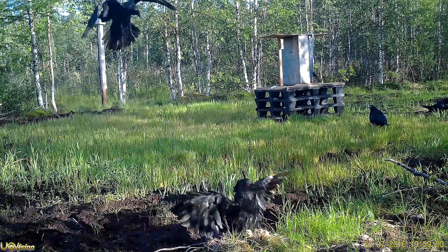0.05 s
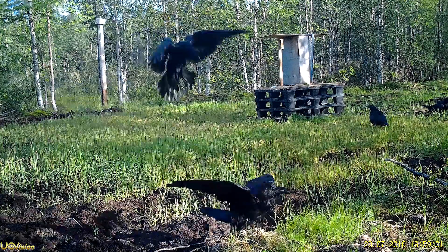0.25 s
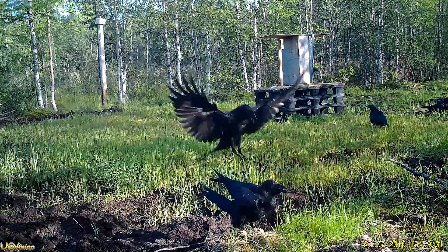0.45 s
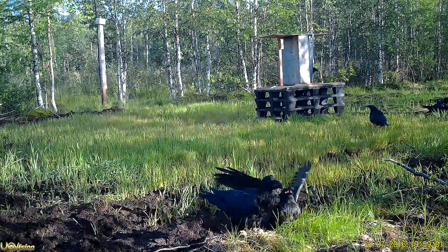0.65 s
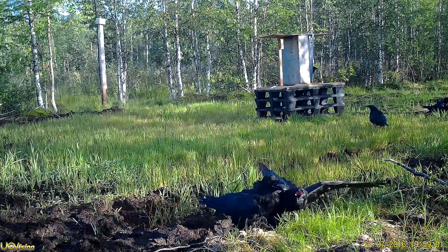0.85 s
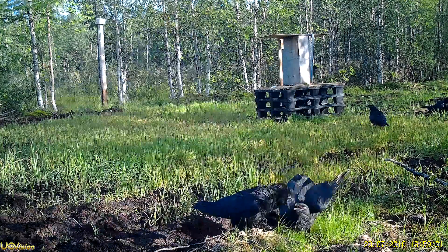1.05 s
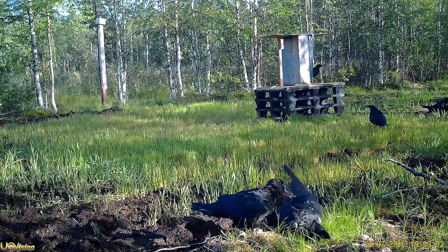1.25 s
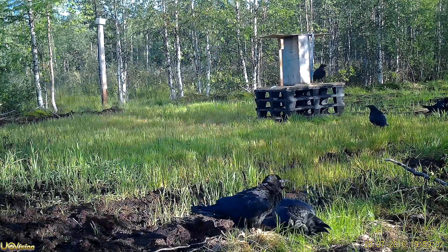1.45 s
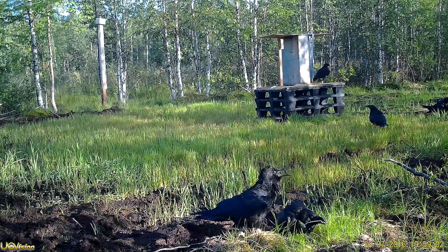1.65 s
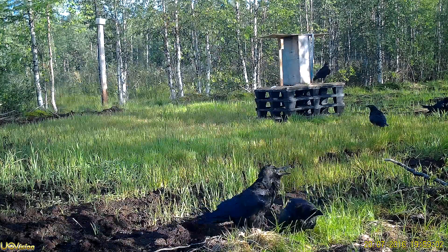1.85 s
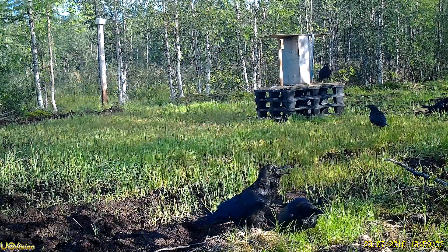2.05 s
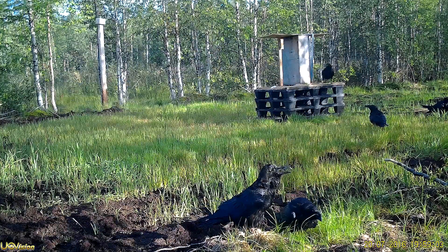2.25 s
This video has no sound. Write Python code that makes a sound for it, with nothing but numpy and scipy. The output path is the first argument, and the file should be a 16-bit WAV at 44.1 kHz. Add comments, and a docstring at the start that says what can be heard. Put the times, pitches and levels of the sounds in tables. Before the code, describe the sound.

Two hoarse raven caws outdoors, the second breaking into a rasping scream.

```python
"""Two ravens squabbling in a forest clearing.

Two harsh, arching caws from vibrating throat membranes, each shaken by a fast flutter. In the second,
a lower voice beats against the note, which breaks into a turbulent scream. The throat pops as it opens
and shuts; wings swish and low grunts sound. Ground and trees return a faint echo over quiet air."""
import sys
import numpy as np
from scipy import signal
from scipy.fft import rfft, irfft
from scipy.io import wavfile
from scipy.ndimage import uniform_filter1d

SR = 44100
rng = np.random.default_rng(int(sys.argv[2]) if len(sys.argv) > 2 else 0)


def log_audio(samples):
    """Write samples as a 16-bit WAV file to the path given in sys.argv[1]."""
    # one column per channel
    frames = np.atleast_2d(samples).T
    # limit to full scale, then quantise
    limited = np.clip(frames, -1, 1)
    pcm = np.round(limited * 32767).astype(np.int16)
    wavfile.write(sys.argv[1], SR, pcm)


N = 101429


def undb(db):
    """Decibels to gain."""
    return 10 ** (np.asarray(db) / 20)


def unit(x):
    """Scale to rms 1."""
    return x / np.sqrt(np.mean(x ** 2))


def gain_at(hz, spectrum):
    """Gain of an (f/Hz, level/dB) curve, interpolated over log frequency."""
    f, db = np.array(spectrum, float).T
    return undb(np.interp(np.log(np.maximum(hz, 1)), np.log(f), db))


def coloured(x, spectrum):
    """Filter by an (f/Hz, level/dB) curve; rms 1."""
    f = np.arange(N // 2 + 1) * SR / N
    return unit(irfft(rfft(x) * gain_at(f, spectrum), N))


def noise(spectrum):
    """Coloured noise, rms 1."""
    return coloured(rng.standard_normal(N), spectrum)


def wander(rate_hz):
    """Smooth random drift up to about rate_hz, rms 1."""
    f = np.arange(N // 2 + 1) * SR / N
    return unit(irfft(rfft(rng.standard_normal(N)) * np.exp(-(f / rate_hz) ** 2), N))


def swell(t, centre, length):
    """Gaussian rise and fall."""
    return np.exp(-8 * ((t - centre) / length) ** 2)


def ramp(t, start, length):
    """Linear rise from 0 to 1."""
    return np.clip((t - start) / length, 0, 1)


# Air and rumble spectra: f/Hz, relative level/dB
AIR_SPECTRUM = [(15, -34), (25, -4), (113, 0), (209, -5), (400, -9), (1620, -19), (15500, -23.5)]
RUMBLE_SPECTRUM = [(20, -6), (60, -6), (150, -6), (300, -11.5), (700, -22), (2000, -34)]
# Rumble envelope: t/s, level/dB
RUMBLE_ENVELOPE = [(0, -67), (.4, -60), (1.2, -60.5), (1.45, -69.5), (2.3, -72.5)]


def air(t, steady_db=-71):
    """Steady outdoor air, and a rumble of stirred air that dies down as the birds settle."""
    rumble_db = np.interp(t, *np.array(RUMBLE_ENVELOPE).T)
    rumble = noise(RUMBLE_SPECTRUM) * undb(rumble_db + 1.5 * wander(19))
    return undb(steady_db) * noise(AIR_SPECTRUM) + rumble


# Echo spectra: f/Hz, relative level/dB
GROUND_SPECTRUM = [(300, -6), (1400, -4.5), (4000, -1), (15000, -3)]
FOREST_SPECTRUM = [(300, -1), (1600, -0.5), (4500, -2.5), (15000, -9.5)]


def clearing(t, x):
    """Add quick, bright scatter from the grass and a faint echo from trees that absorb treble."""
    def tail(spectrum, db, t60_s, rise_s):
        envelope = undb(-60 * t / t60_s) * (1 - np.exp(-t / rise_s))
        return undb(db) * unit(noise(spectrum) * envelope) / np.sqrt(N)
    ground = tail(GROUND_SPECTRUM, db=-19, t60_s=.19, rise_s=.0028)
    forest = tail(FOREST_SPECTRUM, db=-47, t60_s=1.0, rise_s=.047)
    return x + signal.fftconvolve(x, ground + forest)[:N]


# Wing strokes: centre t/s, length/s, level/dB
WING_STROKES = [(0.045, 0.18, -64.5), (0.264, 0.084, -68), (0.646, 0.091, -63)]
# Feather noise: f/Hz, relative level/dB
FEATHER_SPECTRUM = [(200, 1), (2000, 3), (6000, -1), (13000, -8.5), (16000, -23)]


def wings(t):
    """Feathers swish with a grainy flicker."""
    envelope = sum(undb(db) * swell(t, at, length) for at, length, db in WING_STROKES)
    return noise(FEATHER_SPECTRUM) * undb(2.9 * wander(200)) * envelope


# Grunts ending the second caw: centre t/s, length/s, f/Hz, level/dB
GRUNTS = [(1.079, .016, 338.5, -42), (1.099, 0.014, 322, -39.5), (1.122, 0.011, 438, -32.5),
          (1.132, 0.017, 362, -35.5)]


def grunts(t):
    """Short low tones from the scuffle."""
    return sum(undb(db) * swell(t, at, length) * np.sin(2 * np.pi * hz * (t - at))
               for at, length, hz, db in GRUNTS)


# Throat pops: t/s, ring level/dB, crack level/dB
POPS = [(.185, -42, -43), (.194, -34, -44.5), (0.204, -40.5, -36.5), (0.554, -51, -35.5),
        (0.591, -38, -60.5), (.643, -31, -57), (.762, -28, -50), (.769, -25, -37), (.781, -29.5, -24.5),
        (1.116, -10.5, -38), (1.128, -6, -30.5)]
# Throat modes: f/Hz, relative level/dB, T60/s
THROAT_MODES = [(1180, -0.5, 0.012), (1430, -1, .015), (1736, -9, 0.025), (2550, -19, .014)]
# Crack noise: f/Hz, relative level/dB
CRACK_SPECTRUM = [(300, -23.5), (800, -6.5), (1400, 4.5), (4500, -6), (8000, -20), (15000, -46.5)]


def pops(t, ring_rise_s=.00069, crack_rise_s=.0003, crack_decay_s=.0025):
    """The throat opens and shuts: each pulse rings its modes, with a short crack."""
    rings, cracks = 0, 0
    for start, ring_db, crack_db in POPS:
        age = np.maximum(t - start, 0)
        ring = sum(undb(db - 60 * age / t60) * np.sin(2 * np.pi * hz * age)
                   for hz, db, t60 in THROAT_MODES)
        rings += undb(ring_db) * ring * (1 - np.exp(-age / ring_rise_s)) ** 2
        cracks += undb(crack_db) * np.exp(-age / crack_decay_s) * (1 - np.exp(-age / crack_rise_s))
    return rings + cracks * noise(CRACK_SPECTRUM)


# Scream envelope: t/s, level/dB
SCREAM_ENVELOPE = [(.939, -50), (.956, -32.5), (.98, -24), (1.005, -28.5), (1.035, -41), (1.07, -46.5),
                   (1.09, -65)]
# Throat turbulence (shared with second_caw) and snap noise: f/Hz, relative level/dB
HARSH_RASP = [(300, -46), (550, -32.5), (800, -7.5), (1050, -12), (1450, 1.5), (1750, 7.5), (2000, -5.5),
              (2600, -12.5), (4500, -2.5), (6200, -6), (7700, -13.5), (8600, -24.5), (9500, -13.5),
              (12000, -27), (15000, -48.5)]
SNAP_SPECTRUM = [(400, -51), (2700, -12.5), (4200, 3), (7600, -4), (8600, -21.5), (9500, -11), (12000, -19),
                 (15000, -43.5)]


def scream(t, burst_hz=108, throb_db=4.5, snap_decay_s=.0032):
    """The second caw breaks into uneven bursts of turbulence, each opening with a bright snap."""
    started = t > SCREAM_ENVELOPE[0][0]
    cycles = np.cumsum(burst_hz * (1 + .097 * wander(80)) * started) / SR
    envelope = undb(np.interp(t, *np.array(SCREAM_ENVELOPE).T, left=-np.inf, right=-np.inf))
    roar = undb(throb_db * (np.cos(2 * np.pi * cycles) - 2)) * noise(HARSH_RASP)
    burst_age = (cycles % 1) / burst_hz
    snaps = undb(1 + 2 * wander(100)) * np.exp(-burst_age / snap_decay_s) * noise(SNAP_SPECTRUM)
    return envelope * (roar + snaps)


def flutter(t, start, rate_hz=86.4, slowing_hz_per_s=50):
    """Phase and depth of a fast tremble that slows through a caw, then calms."""
    age = t - start
    hz = (rate_hz - slowing_hz_per_s * np.clip(age, 0, .5)) * (1 + .035 * wander(40))
    phase = 2 * np.pi * np.cumsum(hz * (age > 0)) / SR
    depth = 1 - .75 * ramp(age, start=.3, length=.063)
    return phase, depth


def creak(age, flutter_phase, depth_db=22, fade_s=.03, lag_cycles=.38):
    """Onset gain: each flutter cycle snaps open and sags, less and less."""
    sag = (flutter_phase / (2 * np.pi) - lag_cycles) % 1 - .3
    return uniform_filter1d(undb(-depth_db * np.exp(-age / fade_s) * sag), size=24)


def beak_notch(age, hz, start_hz=8550, climb_hz_per_s=10000, width_hz=740, gain_db=-14.5):
    """Gain of a treble dip that climbs as the beak opens."""
    offset_hz = hz - start_hz - climb_hz_per_s * age
    return undb(gain_db * np.exp(-(offset_hz / width_hz) ** 2))


EDGE_S = .012
HOARSE_DB, HOARSE_FADE_S = 7.5, .07
RESONANCE_HZ, RESONANCE_FLANK_HZ = 1430, 260


def voice(t, contour, throat, turbulence, tremble, *, swing, jitter, shimmer_db, rasp_db,
          h1_throb_db, h2_throb_db, treble_throb_db):
    """One membrane: flutter swings pitch and level; each cycle jitters and lets out a puff of noise."""
    times, *columns = np.array(contour, float).T
    pitch, h1_db, h2_db, treble_db = (np.interp(t, times, c) for c in columns)
    flutter_phase, depth = tremble
    age = np.maximum(t - times[0], 0)
    gate = ramp(t, times[0] - EDGE_S, EDGE_S) * (1 - ramp(t, times[-1], EDGE_S))
    shake = depth * (np.cos(flutter_phase) + .25 * np.cos(2 * flutter_phase)) * (1 + .3 * wander(60))
    hoarse = undb(HOARSE_DB * np.exp(-age / HOARSE_FADE_S))
    hz = pitch * (1 + swing * shake + jitter * hoarse * depth * wander(700))
    phase = 2 * np.pi * np.cumsum(hz) / SR

    h1 = undb(h1_db + h1_throb_db * shake) * np.sin(phase)
    # Above the main throat resonance, each upswing of pitch weakens harmonic 2.
    flank = ramp(2 * pitch, RESONANCE_HZ, RESONANCE_FLANK_HZ)
    h2 = undb(h2_db - h2_throb_db * flank * shake) * np.sin(2 * phase)

    overtones, power = 0, 0
    for k in range(3, 24):
        gain = throat(t, k * hz) * beak_notch(age, k * hz) * (k * hz < SR / 2)
        throb_db = treble_throb_db * np.cos(flutter_phase + .5 * (k - 3)) + shimmer_db * wander(220)
        overtones += gain * undb(depth * throb_db) * np.sin(k * phase + rng.uniform(0, 2 * np.pi))
        power += gain ** 2

    puffs = coloured(rng.standard_normal(N) * (1 + np.cos(phase)), turbulence)
    rasp = hoarse * undb(rasp_db + 4 * depth * np.cos(flutter_phase)) * np.sqrt(depth) * puffs
    treble = undb(treble_db) * (overtones / np.sqrt(power) + rasp)
    return np.sqrt(2) * gate * creak(age, flutter_phase) * (h1 + h2 + treble)


RESHAPE_S = .06
# Open throat response, then its change: f/Hz, relative level/dB
FIRST_THROAT = [(1500, 0.5), (1900, 3), (2250, 3.5), (2600, -0.5), (3000, 4.5), (3400, -7.5), (4150, -13),
                (4700, -9.5), (5200, -16), (5750, -12), (6800, -21), (8300, -27.5), (9200, -23.5),
                (10300, -34), (11500, -32.5), (15000, -57.5)]
NARROWING = [(2400, -4.5), (3100, 1), (5200, 4.5), (6000, -9), (7200, 0)]


def first_throat(t, hz):
    """Overtone gain of the first caw: the throat starts open, then narrows."""
    return gain_at(hz, FIRST_THROAT) * gain_at(hz, NARROWING) ** ramp(t, .42, RESHAPE_S)


# Clear voice: t/s, f/Hz, harmonic 1 level/dB, harmonic 2 level/dB, treble level/dB
CLEAR_VOICE = [(0.19, 479.2, -47, -54.5, -57.5), (0.208, 608.4, -39, -31.5, -45.5),
               (0.22, 683, -35.5, -26.5, -39.5), (0.238, 688.6, -32.5, -23, -33),
               (0.272, 745.5, -29.5, -16, -34.5), (0.296, 806, -31, -22.5, -37),
               (0.406, 838.5, -26.5, -25.5, -34.5), (0.462, 815.2, -27, -23.5, -37.5),
               (0.488, 819, -27, -23.5, -38), (0.518, 753.3, -34, -25, -31),
               (0.536, 744.4, -32.5, -22.5, -31), (0.552, 713, -42.5, -25.5, -36),
               (.558, 669, -44.5, -25.5, -50), (0.572, 594, -49, -32.5, -56.5),
               (0.59, 471, -61, -54, -60.5)]
# Throat turbulence: f/Hz, relative level/dB
CLEAR_RASP = [(300, -41), (800, -8.5), (1200, -0.5), (1500, 5), (1950, -13.5), (2600, -9), (3300, -6),
              (4700, -1.5), (6800, -8.5), (8600, -22), (12000, -29), (15000, -47.5)]


def first_caw(t):
    """One membrane sounds a clear, trembling arch."""
    tremble = flutter(t, CLEAR_VOICE[0][0])
    return voice(t, CLEAR_VOICE, first_throat, CLEAR_RASP, tremble,
                 swing=.025, jitter=.0055, shimmer_db=2.5, rasp_db=-17,
                 h1_throb_db=.5, h2_throb_db=4, treble_throb_db=3)


# Open throat response, then its two changes: f/Hz, relative level/dB
SECOND_THROAT = [(1500, -5.5), (2100, 6.5), (2600, 7), (3400, 2), (4200, 2.5), (5200, 3.5), (6200, -15.5),
                 (7600, -11.5), (8600, -18.5), (11500, -26), (15000, -47)]
STRAIN = [(2000, 2.5), (2550, -10.5), (3300, 1.5), (4150, 3), (5200, 0.5), (9500, -2)]
CLOSING = [(2100, -12), (2800, 0), (3300, 4.5), (4200, -12.5), (5000, -5), (5650, 4), (6500, 3), (9500, -5)]


def second_throat(t, hz):
    """Overtone gain of the second caw: the throat strains to scream, then narrows as the beak closes."""
    strain = gain_at(hz, STRAIN) ** ramp(t, .94, RESHAPE_S)
    closing = gain_at(hz, CLOSING) ** ramp(t, 1.07, RESHAPE_S)
    return gain_at(hz, SECOND_THROAT) * strain * closing


# Beating voices: t/s, f/Hz, harmonic 1 level/dB, harmonic 2 level/dB, treble level/dB
UPPER_VOICE = [(0.766, 580, -57.5, -36.5, -64), (0.784, 730, -45.5, -26, -47.5),
               (.815, 827, -33.5, -27.5, -30.5), (.85, 879.4, -33, -25.5, -30),
               (0.893, 890.2, -29, -23.5, -30), (.945, 860, -32, -21.5, -34), (0.976, 822.5, -38, -17, -28),
               (1.005, 834, -39.5, -19.5, -29), (1.045, 868.2, -35.5, -26.5, -32),
               (1.072, 829.8, -36, -23.5, -35.5), (1.085, 790, -37, -36, -36.5),
               (1.092, 722, -37.5, -28, -42), (1.099, 674, -41.5, -42, -34.5),
               (1.111, 629, -44.5, -33, -37), (1.121, 560, -47, -24, -43), (1.139, 472.8, -53, -58, -61)]
LOWER_VOICE = [(.78, 600, -63, -40.5, -49), (.83, 704, -54.5, -31.5, -42), (.89, 736, -55.5, -34.5, -48),
               (.945, 760, -54.5, -39, -39.5), (.96, 749.6, -42.5, -21.5, -29),
               (.995, 738.3, -41.5, -21, -26), (1.031, 751.6, -42.5, -24, -35.5),
               (1.085, 701, -49, -35.5, -46.5)]


def second_caw(t):
    """Two membranes share one flutter and beat harshly against each other."""
    tremble = flutter(t, UPPER_VOICE[0][0])
    upper = voice(t, UPPER_VOICE, second_throat, HARSH_RASP, tremble,
                  swing=.028, jitter=.01, shimmer_db=3.5, rasp_db=-14,
                  h1_throb_db=4, h2_throb_db=1, treble_throb_db=1.5)
    lower = voice(t, LOWER_VOICE, second_throat, HARSH_RASP, tremble,
                  swing=.055, jitter=.06, shimmer_db=2.5, rasp_db=-11.5,
                  h1_throb_db=3, h2_throb_db=1, treble_throb_db=4)
    return upper + lower


def scene(throat_cutoff_hz=402.8):
    """Ravens in the clearing over quiet air; their small throats radiate no bass."""
    t = np.arange(N) / SR
    highpass = signal.butter(4, throat_cutoff_hz, "high", fs=SR, output="sos")
    calls = signal.sosfilt(highpass, first_caw(t) + second_caw(t) + scream(t) + pops(t))
    return (clearing(t, calls + grunts(t) + wings(t)) + air(t))[None]


def record(dry, cutoff_hz=15450):
    """Steep low-pass on the top treble."""
    return signal.sosfilt(signal.ellip(10, .2, 80, cutoff_hz, fs=SR, output="sos"), dry)


dry = scene()
out = record(dry)
log_audio(out)
```